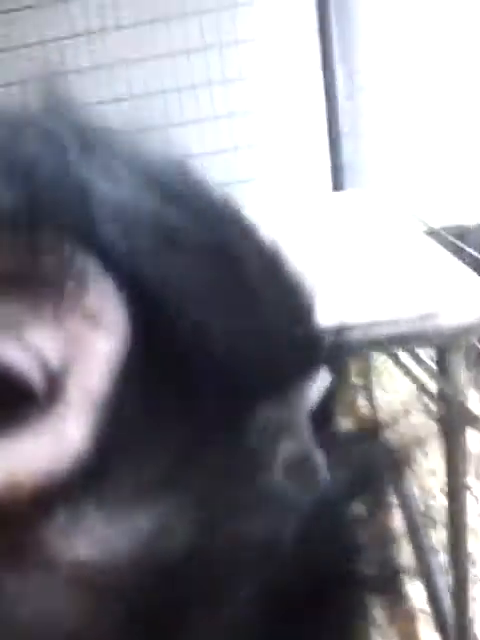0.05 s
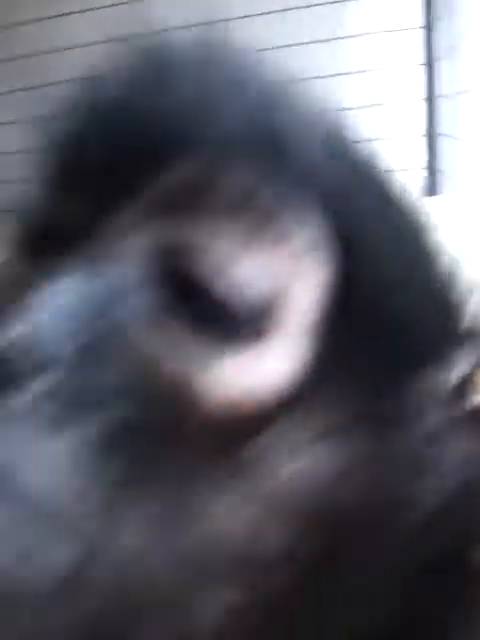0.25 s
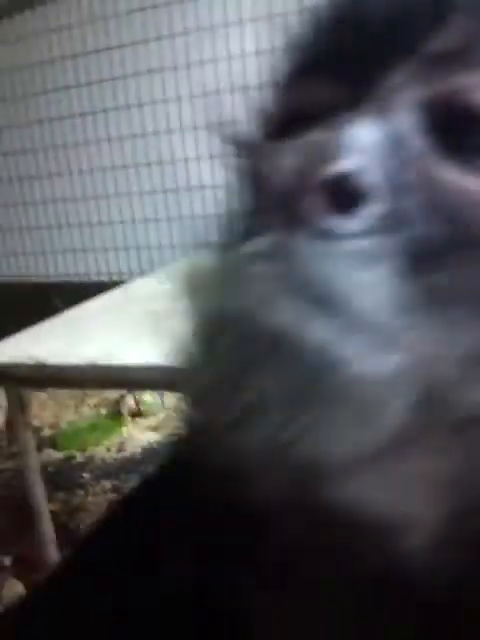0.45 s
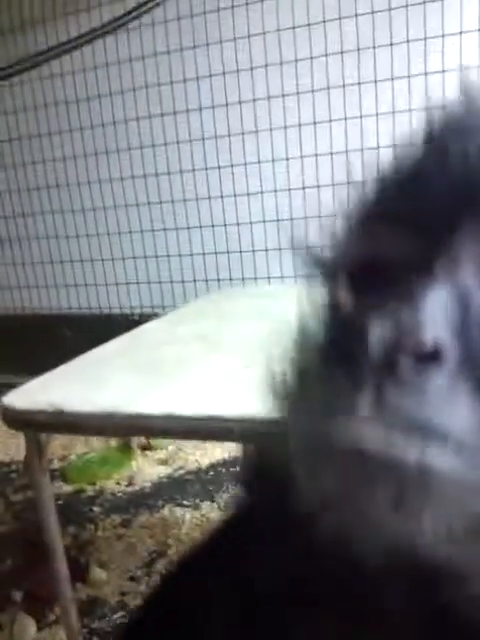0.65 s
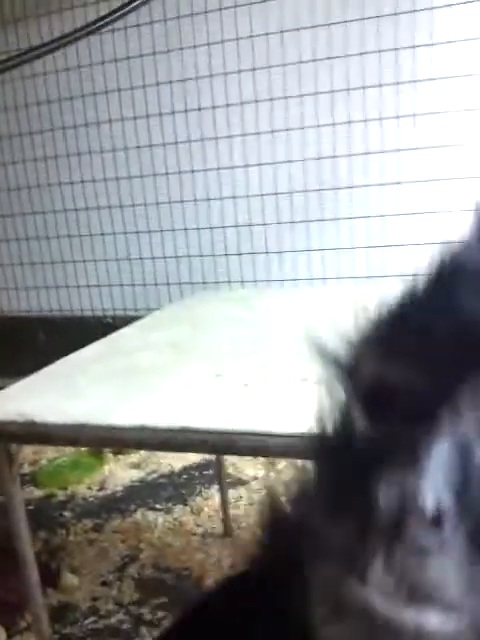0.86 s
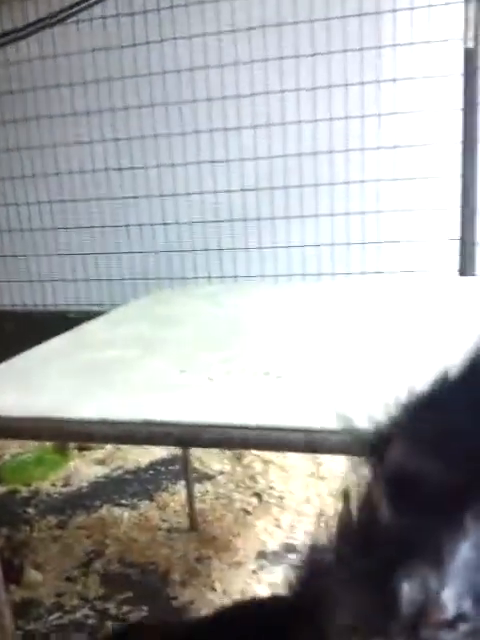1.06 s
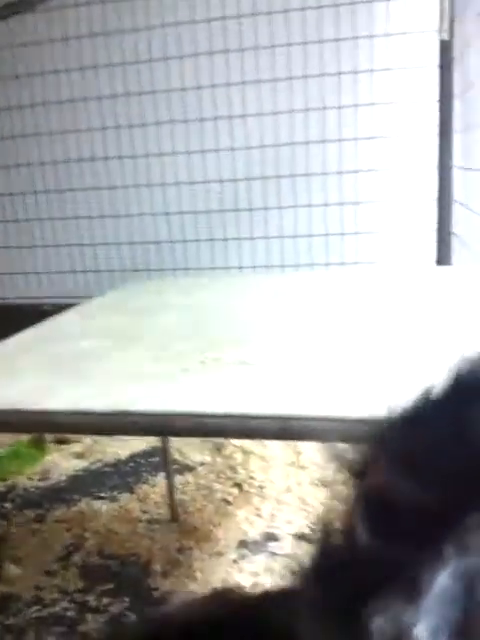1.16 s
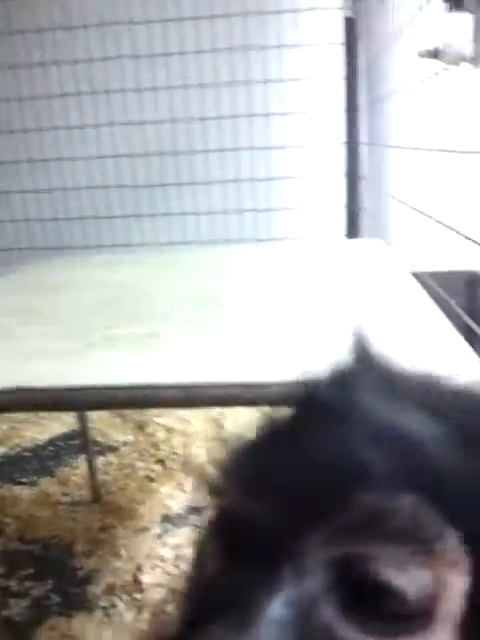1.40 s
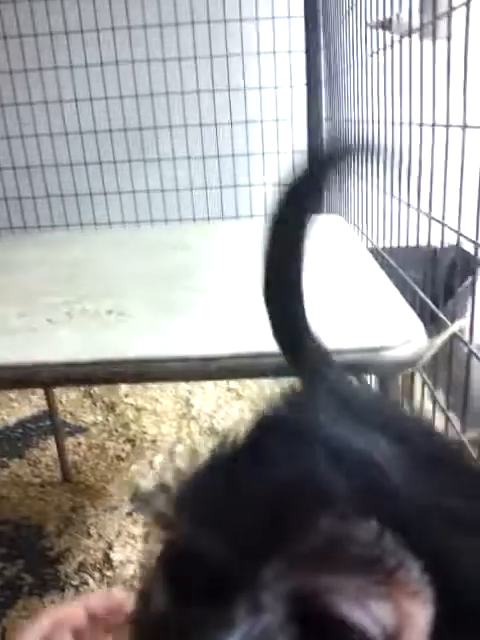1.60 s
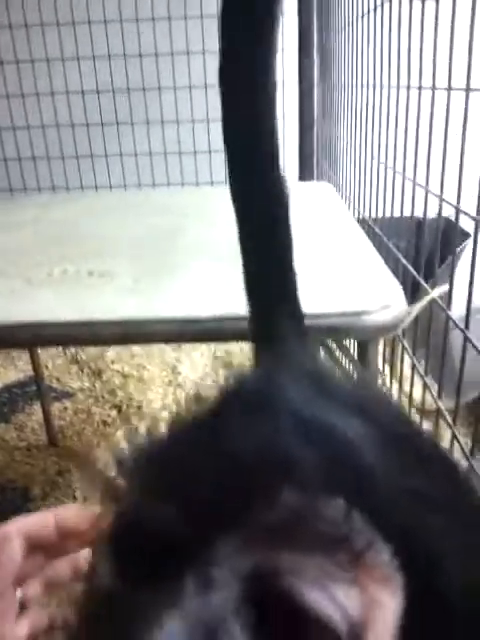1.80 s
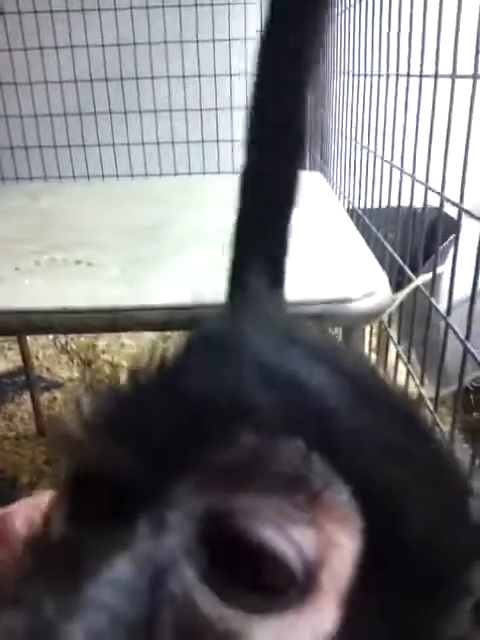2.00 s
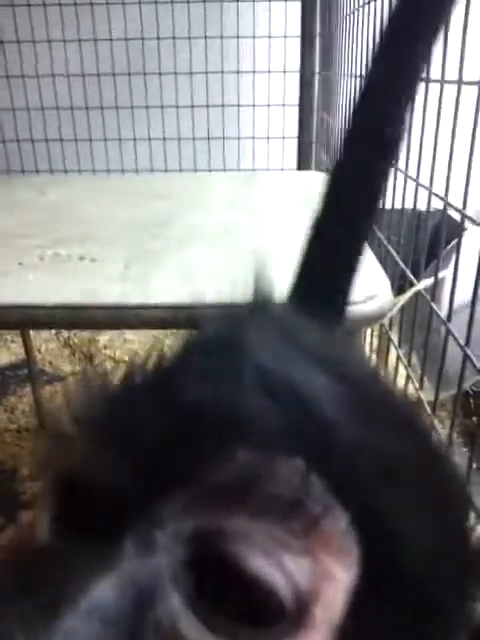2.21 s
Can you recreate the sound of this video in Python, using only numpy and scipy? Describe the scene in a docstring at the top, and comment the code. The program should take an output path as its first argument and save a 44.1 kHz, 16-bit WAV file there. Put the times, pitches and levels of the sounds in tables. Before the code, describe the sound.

A small monkey right at the microphone clicks and clucks, then gives five short, high squeaks with clicks between them. Its fur rustles, and it ends with soft grunts and darker chirps. A faint hum fills the hard-walled cage room.

```python
"""A small monkey right at the microphone in a hard-walled cage room, over a faint hum and a thin whine.
Its fur rustles, lips and tongue click and cluck, then five squeaks come with more clicks between them.
Each is a rattle of pulses ringing the throat and breaking into a high clear note; walls and cage answer.
Late on, two dull puffs touch the microphone, the monkey grunts softly and ends on darker, gliding chirps."""
import sys
import numpy as np
from scipy import signal
from scipy.fft import rfft, irfft, next_fast_len
from scipy.io import wavfile
from scipy.ndimage import uniform_filter1d

SR = 44100
rng = np.random.default_rng(int(sys.argv[2]) if len(sys.argv) > 2 else 0)


def digitize_waveform(pressure):
    """Quantize a signal to 16-bit integers and store it at the path in sys.argv[1].

    Rows of a 2-D input are taken as channels; values are limited to [-1, 1].
    """
    field = np.atleast_2d(pressure).T
    bounded = np.clip(field, -1, 1)
    quanta = np.round(bounded * 32767).astype(np.int16)
    wavfile.write(sys.argv[1], SR, quanta)


N = 99225
TIME = np.arange(N) / SR
SPARKLE_HZ, SPARKLE_WIDTH_HZ = 13500, 1600  # a thin high sparkle on the calls


def amp(db):
    """Decibels to gain."""
    return 10 ** (np.asarray(db) / 20)


def bump(x, centre, width):
    """A bell curve of height 1."""
    return np.exp(-((x - centre) / width) ** 2)


def along(points, hz):
    """Read (Hz, value) points on a log frequency axis."""
    f, v = np.transpose(points)
    return np.interp(np.log(hz + 1), np.log(f + 1), v)


def resonate(x, colour):
    """Pass x through a minimum-phase filter drawn as (Hz, dB) points."""
    m = 2 * next_fast_len(len(x))
    hz = np.fft.rfftfreq(m, 1 / SR)
    cepstrum = irfft(np.log(amp(along(colour, hz))), m)
    cepstrum[1:m // 2] *= 2
    cepstrum[m // 2 + 1:] = 0
    return irfft(rfft(x, m) * np.exp(rfft(cepstrum)), m)[:len(x)]


def noise(colour):
    """Coloured noise of rms 1."""
    x = resonate(rng.standard_normal(N), colour)
    return x / np.sqrt(np.mean(x ** 2) + 1e-20)


def swells(rows, colour):
    """Noise that rises and falls around each row's time."""
    return noise(colour) * sum(amp(db) * bump(TIME, s, width) for s, width, db in rows)


def room_tone(air_db=-56.5, hum_hz=122.6, hum_db=-64.5, whine_hz=15735, whine_db=-70):
    """Still air, a mains hum and a thin whine, steady throughout."""
    # The air's spectrum. Each row: frequency in Hz, relative level in dB.
    air_colour = [(24, -51), (40, -16.5), (105, -10), (190, -15.5), (13000, -38)]
    tone = lambda hz, db: np.sqrt(2) * amp(db) * np.sin(2 * np.pi * hz * TIME)
    return amp(air_db) * noise(air_colour) + tone(hum_hz, hum_db) + tone(whine_hz, whine_db)


def rustles():
    """Fur brushes close to the microphone in short swells of noise."""
    # Each row: time of the peak in seconds, half width in seconds, level in dB.
    brushes = [(.004, 0.021, -31.5), (.49, 0.026, -37.5), (.902, 0.014, -44), (1.008, 0.011, -37.5),
               (1.84, 0.031, -39.5), (2.17, 0.077, -48.5)]
    # The fur's spectrum. Each row: frequency in Hz, relative level in dB.
    fur_colour = [(40, -22.5), (450, 4.5), (1900, -11), (3800, 3.5), (8000, -1.5), (16000, -46)]
    return swells(brushes, fur_colour)


def room(x, wall_delay_s=0.0073, early_t60_s=0.17, early_db=-21, late_db=-20):
    """Near walls answer quickly; the room's tail dies at its own speed in each band."""
    # The echo's spectrum. Each row: frequency in Hz, relative level in dB.
    wall_colour = [(450, 5.5), (4600, -3), (7500, 5.5), (12000, -7)]
    # The tail's decay. Each row: frequency in Hz, seconds to fall 60 dB.
    tail_t60 = [(500, 0.31), (4500, 0.33), (8000, 0.41)]
    hz, t, spectra = signal.stft(rng.standard_normal((2, SR // 2)), SR, nperseg=256)
    spectra = spectra * amp(along(wall_colour, hz))[:, None]
    late_t60_s = along(tail_t60, hz)[:, None]
    early = signal.istft(spectra[0] * np.exp(-np.log(1000) * t / early_t60_s), SR, nperseg=256)[1]
    late = signal.istft(spectra[1] * np.exp(-np.log(1000) * t / late_t60_s), SR, nperseg=256)[1]
    answer = amp(early_db) * early / np.linalg.norm(early) + amp(late_db) * late / np.linalg.norm(late)
    return signal.fftconvolve(x, np.pad(answer, (int(wall_delay_s * SR), 0)))[:N]


def pop(t60, colour, ring_hz, snap, ring_db=11, ring_octaves=0.44):
    """A sharp release and a dying spray of air ring the mouth at its own note; peak 1."""
    t = np.arange(SR // 16) / SR
    hz = np.fft.rfftfreq(len(t), 1 / SR)
    burst = rng.standard_normal(len(t)) * np.exp(-np.log(1000) * t / t60)
    burst[0] += snap
    shape = along(colour, hz) + ring_db * bump(np.log2(hz + 1), np.log2(ring_hz), ring_octaves)
    x = resonate(burst, np.column_stack([hz, shape]))
    return x / np.abs(x).max()


def clicks_and_clucks(click_t60_s=0.016, cluck_t60_s=0.028, tick_hz=4350, tick_db=-36.5):
    """Thin lip and tongue clicks and fuller throaty clucks, each with two faint wet ticks near it."""
    # Each row: start in seconds, peak level in dB, the mouth's ring in Hz.
    clicks = [(0.1162, -18.5, 5800), (0.1332, -16, 5050), (0.5999, -45.5, 3170), (0.1882, -16, 5040),
              (.372, -36, 6530), (0.3999, -17.5, 2810), (0.417, -20, 2830), (.8231, -27, 1855),
              (.847, -42.5, 4050), (1.022, -14.5, 4640), (1.036, -27.5, 2130), (1.2379, -19.5, 5200),
              (1.523, -17.5, 4970), (1.289, -36, 2530), (1.8614, -22, 2870), (2.122, -26.5, 6140)]
    clucks = [(0.192, -20.5, 3430), (0.2056, -9.5, 3130), (0.9032, -27.5, 430), (0.92, -29.5, 3070),
              (0.931, -29.5, 3530), (1.083, -15.5, 3540), (1.089, -14.5, 3320), (1.0963, -20.5, 440),
              (1.536, -15, 3200), (1.738, -12.5, 1990), (1.752, -6.5, 1880), (1.7971, -7.5, 2670),
              (1.956, -14, 900)]
    # Their spectra. Each row: frequency in Hz, relative level in dB.
    click_colour = [(40, -26), (420, 19.5), (900, 2.5), (6500, 6), (16000, -27.5)]
    cluck_colour = [(40, -28), (450, 9.5), (750, -6), (3200, -6), (4200, -10.5), (16000, -35.5)]
    out = np.zeros(N)
    for s, db, ring_hz in clicks:
        add(out, s, amp(db) * pop(click_t60_s, click_colour, ring_hz, snap=5.3))
    for s, db, ring_hz in clucks:
        add(out, s, amp(db) * pop(cluck_t60_s, cluck_colour, ring_hz, snap=2.5))
    for s, _, _ in clicks + clucks:
        for when, size, octaves in rng.uniform(-1.8, 1, (2, 3)):  # scatter in time, level and pitch
            tick = pop(click_t60_s, click_colour, tick_hz * 2 ** octaves, snap=0.33)
            add(out, s + 0.016 * when, amp(tick_db) * 2 ** size * tick)
    return out


def add(out, s, x):
    """Mix x into out from s seconds on."""
    i = max(0, round(s * SR))
    out[i:i + len(x)] += x[:max(0, N - i)]


def smear(x, spread_s=0.001663, knee_hz=5400):
    """The throat spreads each pulse in time, the treble arriving last."""
    m = 2 * next_fast_len(len(x))
    delay = spread_s * (np.tanh(np.fft.rfftfreq(m, 1 / SR) / knee_hz) - .5)
    return irfft(rfft(x, m) * np.exp(-2j * np.pi * np.cumsum(delay) * SR / m), m)[:len(x)]


def call(curve, throat, jitter=0.7, shimmer_db=11, rasp=1.3, attack_s=0.0018, close_s=0.0079):
    """Pulses at the pitch ring the throat; roughness scatters their timing and size and adds air."""
    s, pitch, level, roughness = np.transpose(sorted(curve))
    t = s[0] + np.arange(int((s[-1] - s[0]) * SR) + SR // 100) / SR
    hz, db, rough = (np.interp(t, s, c) for c in (pitch, level, np.clip(roughness, 0, 1)))
    cycles = np.cumsum(hz) / SR
    onsets = np.interp(np.arange(int(cycles[-1])), cycles, np.arange(len(t)))  # in samples
    k = onsets.astype(int)
    slip, size = rng.uniform(-1.76, 1, (len(onsets), 2)).T
    onsets = np.abs(onsets + jitter * rough[k] * slip * SR / hz[k] / 2)
    pulses = amp(shimmer_db * rough[k] * size) @ np.sinc(np.arange(len(t)) - onsets[:, None])
    air = rasp * rough * np.sqrt(hz / SR) * (1 - cycles % 1) * rng.standard_normal(len(t))
    source = smear(pulses + air)
    # The mouth closes as the call ends, and its resonances sink.
    closing = np.clip(1 + (t - s[-1]) / close_s, 0, 1)
    voice = resonate(source * (1 - closing), throat) + resonate(source * closing, throat * [0.893, 1])
    running_rms = np.sqrt(np.abs(uniform_filter1d(voice ** 2, size=200)) + 1e-12)
    gate = np.interp(t, [s[0], s[0] + attack_s, s[-1] - attack_s / 2, s[-1] + attack_s], [0, 1, 1, 0])
    return voice / running_rms * amp(db) * gate


def squeaks(main_db=9, main_width_hz=253, bite_hz=4340, bite_width_hz=480):
    """Bright calls through the open mouth, sharpened by its narrow main resonance."""
    # One curve a squeak. Each point: time in seconds, pitch in Hz, level in dB, roughness from 0 to 1.
    curves = [
        [(.253, 384.6, -28.5, 0.77), (.260, 407.7, -15.5, 0.07), (.271, 413.7, -13.5, 0.25),
         (.273, 857.6, -9.5, 0.02), (.284, 786, -15, 0.11), (.289, 442, -20, 0.13), (.297, 407, -30, 0.8)],
        [(.431, 389, -5.5, 0.6), (.436, 605, -15.5, 0.77), (.439, 1397, -12, 0.12), (.442, 1384, -10, .14),
         (.446, 1497, -33, 0.2), (.448, 1626, -10.5, 0.14), (.457, 1545, -13, 0.17)],
        [(1.153, 481.3, -40.5, 0.54), (1.160, 520.8, -16.5, 0.78), (1.164, 610.5, -13, 0.58),
         (1.173, 854, -13, 0), (1.179, 805, -16, 0), (1.185, 408, -17.5, 0.42)],
        [(1.320, 287.7, -34, 0.94), (1.330, 302.7, -22, 0.24), (1.333, 329, -17, 0.5), (1.336, 700, -12, 0),
         (1.340, 1476, -16.5, 0.51), (1.346, 1548, -7, 0.04), (1.352, 1758, -11, 0), (1.356, 1690, -10, 0.11)],
        [(1.558, 290, -7, 0.5), (1.565, 397, -31, 0.06), (1.568, 1183, -7, 0.65), (1.576, 1529, -10.5, 0.46),
         (1.578, 1557, -15.5, 0.13), (1.586, 1696, -12.5, 0.05), (1.593, 1420, -13.5, 0.28)],
    ]
    # Each squeak's tone. Each row: main resonance in Hz, bite lift in dB, sparkle lift in dB.
    timbres = [(3310, -2, 10), (3410, 5.5, 4), (3100, -12.5, 5), (3430, -10, 21.5), (3230, -18.5, 21)]
    # The throat's response. Each row: frequency in Hz, relative gain in dB.
    open_throat = [(100, -28.5), (400, -7), (1400, -12), (2050, -22.5), (2650, -5.5), (3300, -3.5),
                   (3800, -2), (4850, -2), (5600, -21.5), (6500, -13.5), (10000, -36.5), (16000, -50.5)]
    out, hz = np.zeros(N), np.fft.rfftfreq(N, 1 / SR)
    sparkle = bump(hz, SPARKLE_HZ, SPARKLE_WIDTH_HZ)
    for curve, (main_hz, bite_db, sparkle_db) in zip(curves, timbres):
        colour = along(open_throat, hz) + main_db * bump(hz, main_hz, main_width_hz)
        colour += bite_db * bump(hz, bite_hz, bite_width_hz) + sparkle_db * sparkle
        add(out, min(curve)[0], call(curve, np.column_stack([hz, colour])))
    return out


def cage(x, ring_hz=3430, t60_s=0.42, gain_db=-42):
    """The cage rings on after sounds that touch its one narrow note."""
    ring = np.sin(2 * np.pi * ring_hz * TIME) * np.exp(-np.log(1000) * TIME / t60_s)
    return amp(gain_db) * signal.fftconvolve(x, ring / np.linalg.norm(ring))[:N]


def puffs():
    """Dull puffs of low noise right on the microphone."""
    # Each row: time of the peak in seconds, half width in seconds, level in dB.
    gusts = [(1.365, 0.035, -50), (1.885, 0.014, -56.5)]
    # Their spectrum. Each row: frequency in Hz, relative level in dB.
    puff_colour = [(50, 2.5), (150, 6.5), (900, -26)]
    return swells(gusts, puff_colour)


def grunts(sag=0.3, overtone_db=-22):
    """Short, nearly pure low notes that sag in pitch."""
    # Each row: start in seconds, length in seconds, middle pitch in Hz, level in dB.
    notes = [(1.597, 0.02, 507, -25), (1.622, 0.019, 417, -24), (1.749, 0.014, 511, -19.5)]
    out = np.zeros(N)
    for s, length, hz, db in notes:
        progress = np.linspace(0, 1, int(length * SR))
        phase = 2 * np.pi * np.cumsum(hz * (1 - sag * (progress - .5))) / SR
        tone = np.sin(phase) + amp(overtone_db) * np.sin(2 * phase)
        add(out, s, amp(db) * np.sin(np.pi * progress) * tone)
    return out


def chirps():
    """Darker, gliding calls with the mouth nearly closed."""
    # One curve a chirp. Each point: time in seconds, pitch in Hz, level in dB, roughness from 0 to 1.
    curves = [
        [(1.801, 740, -14, 0.05), (1.804, 1086, -13, 0.07), (1.814, 1212, -17, 0.03), (1.824, 1470, -31.5, 0)],
        [(1.887, 2280, -58, 0), (1.890, 1962, -14.5, 0), (1.893, 1844, -11.5, 0.01), (1.895, 1359, -10.5, 0.09),
         (1.900, 946, -17, 0.02), (1.906, 615, -12, 0.14), (1.915, 372, -25, 0.04)],
        [(1.959, 740, -18.5, 0.14), (1.971, 885, -25.5, 0.01)],
    ]
    # One value a chirp: relative level of the thin high sparkle in dB.
    sparkle_levels = [-15, 37.5, -4]
    # The throat's response. Each row: frequency in Hz, relative gain in dB.
    closed_throat = [(100, -27.5), (250, -0.5), (520, 9.5), (1200, -8), (2000, -4.5), (3300, 0),
                     (4100, -30.5), (5300, -16.5), (6800, -34), (8500, -22), (16000, -77)]
    out, hz = np.zeros(N), np.fft.rfftfreq(N, 1 / SR)
    for curve, sparkle_db in zip(curves, sparkle_levels):
        colour = along(closed_throat, hz) + sparkle_db * bump(hz, SPARKLE_HZ, SPARKLE_WIDTH_HZ)
        add(out, min(curve)[0], call(curve, np.column_stack([hz, colour])))
    return out


def scene():
    """The monkey close up on one microphone, with walls and cage answering behind it."""
    monkey = squeaks() + chirps() + clicks_and_clucks() + grunts() + rustles()
    return (monkey + room(monkey) + cage(monkey) + puffs() + room_tone())[None]


def record(dry):
    """The microphone rounds the highest peaks, drops the deepest bass and cuts off the top treble."""
    ceiling, low_hz, top_hz = 0.6, 40.5, 16400
    rounded = dry / (1 + np.abs(dry / ceiling) ** 6) ** (1 / 6)
    m = next_fast_len(N + SR // 2)
    hz = np.fft.rfftfreq(m, 1 / SR)
    passband = hz ** 2 / (hz ** 2 + low_hz ** 2) * (hz < top_hz)
    return irfft(rfft(rounded, m) * passband, m)[..., :N]


dry = scene()
out = record(dry)
digitize_waveform(out)
```